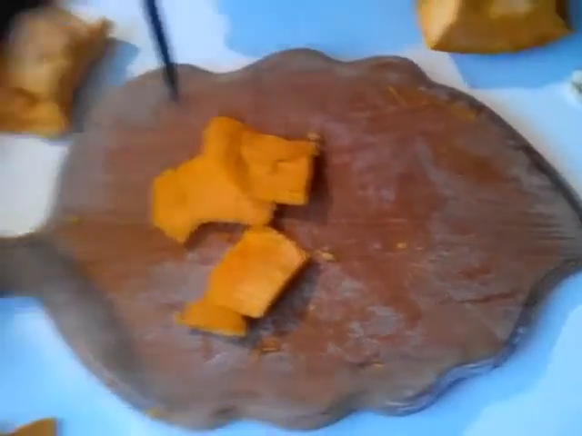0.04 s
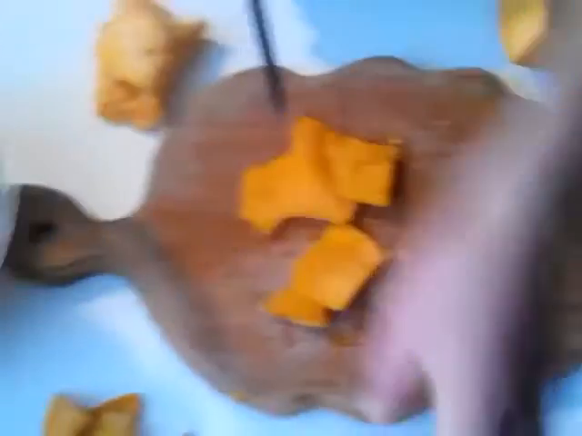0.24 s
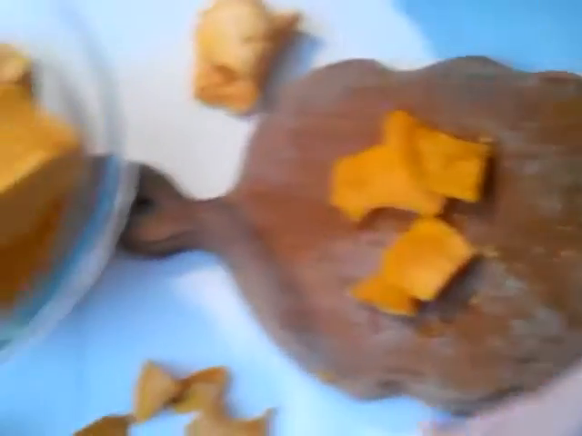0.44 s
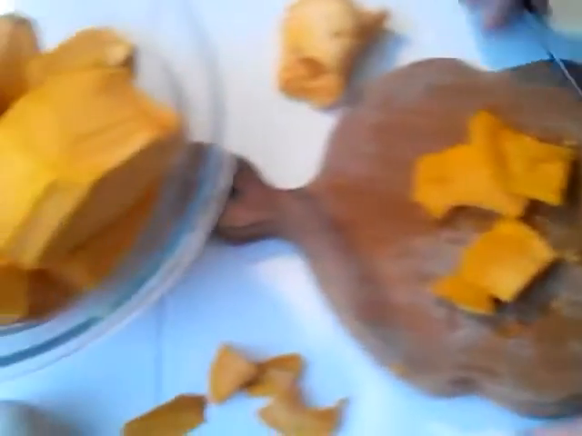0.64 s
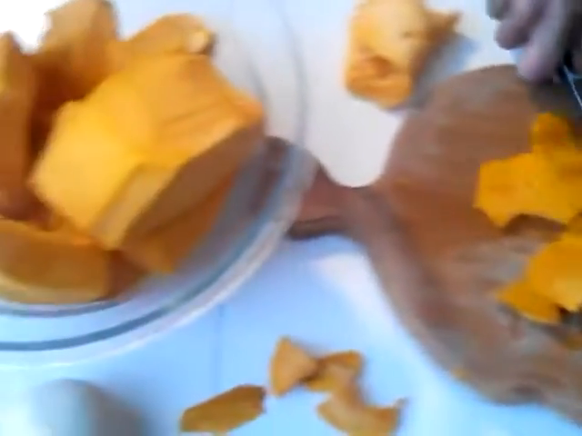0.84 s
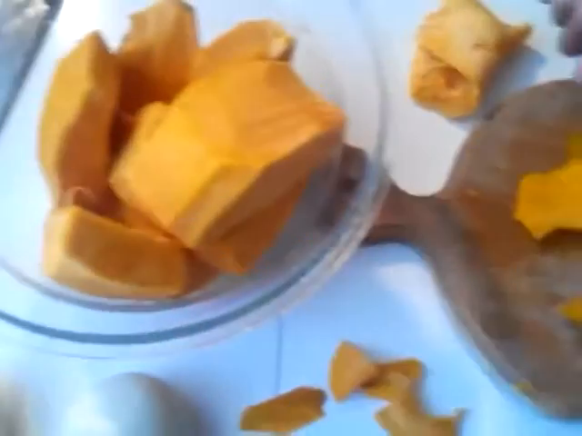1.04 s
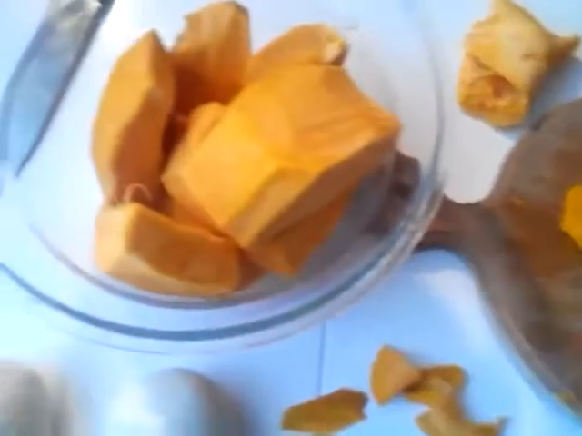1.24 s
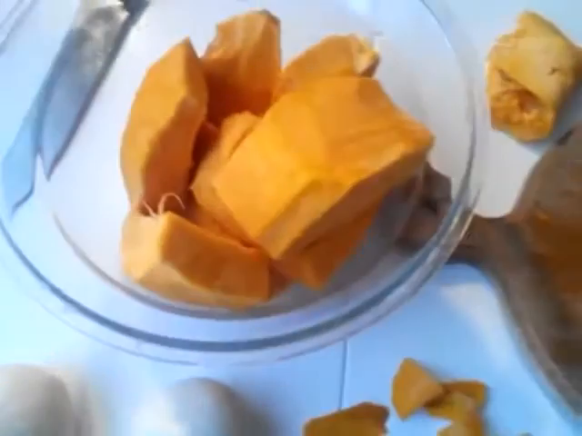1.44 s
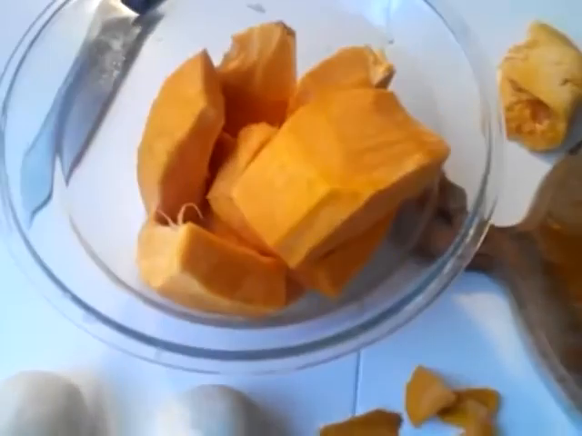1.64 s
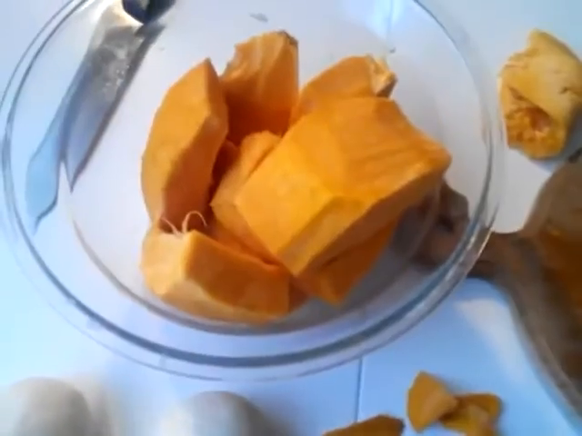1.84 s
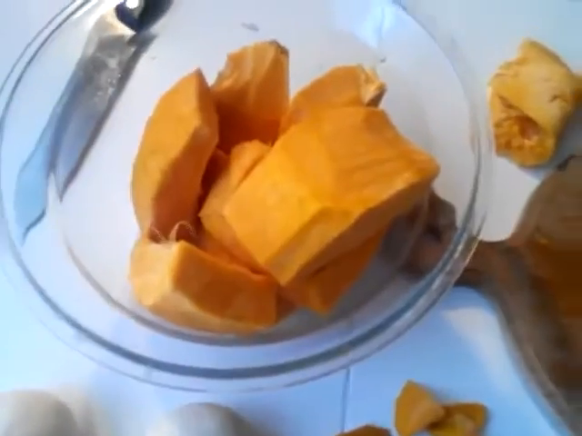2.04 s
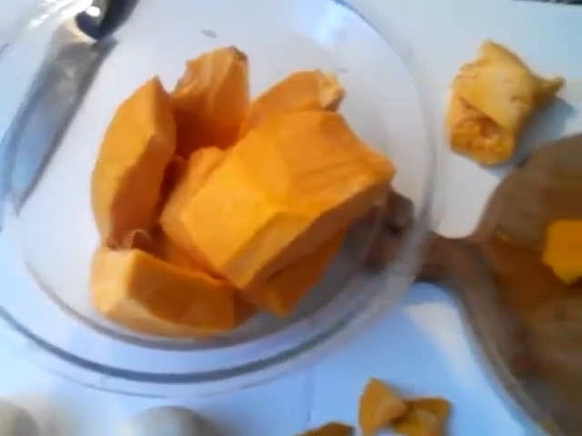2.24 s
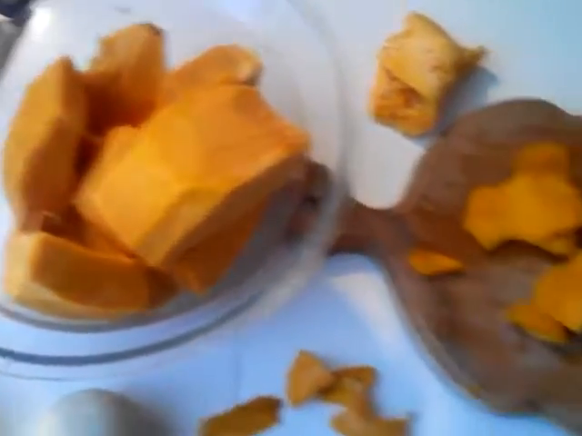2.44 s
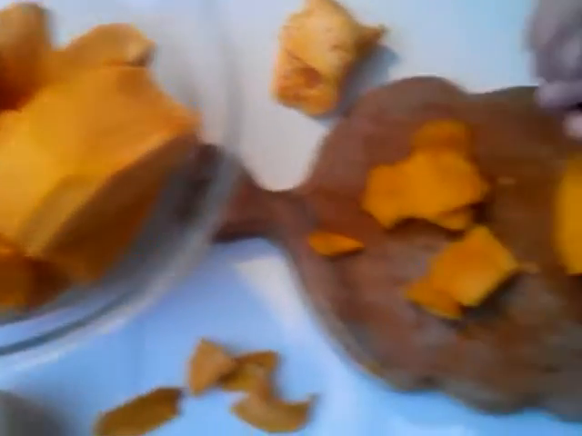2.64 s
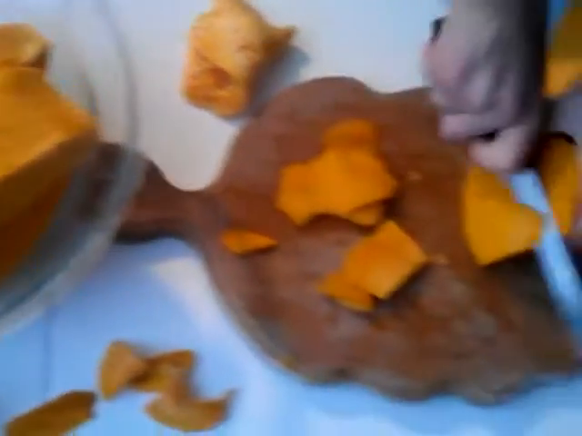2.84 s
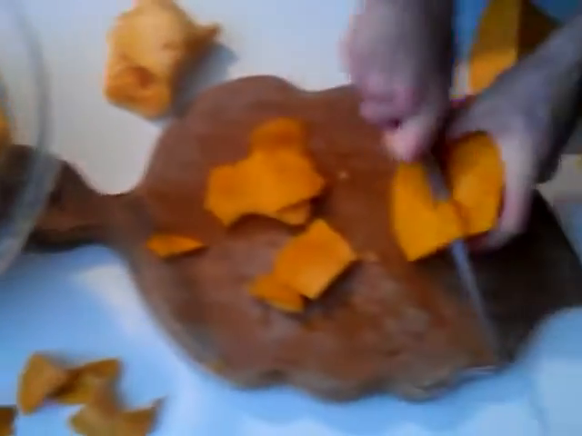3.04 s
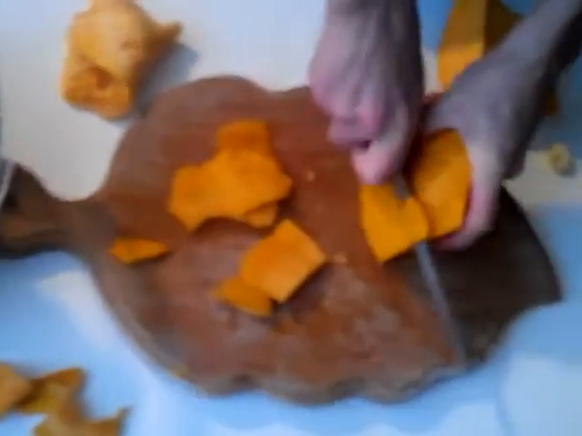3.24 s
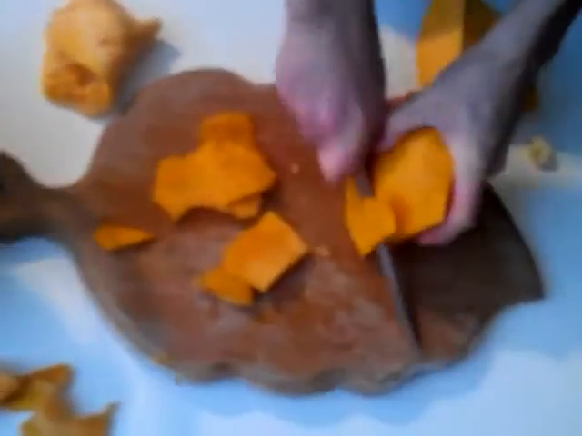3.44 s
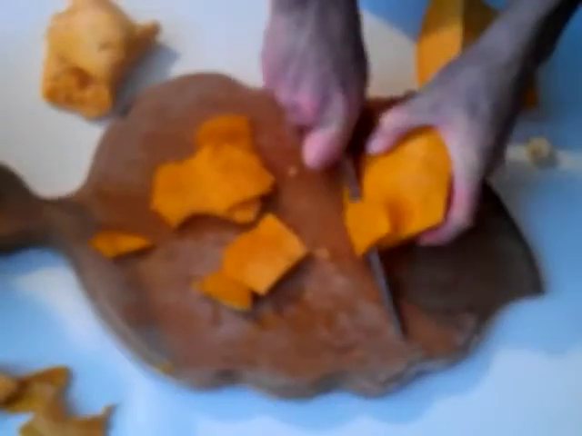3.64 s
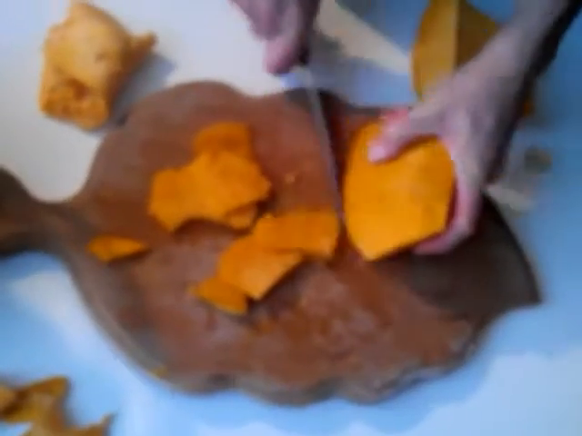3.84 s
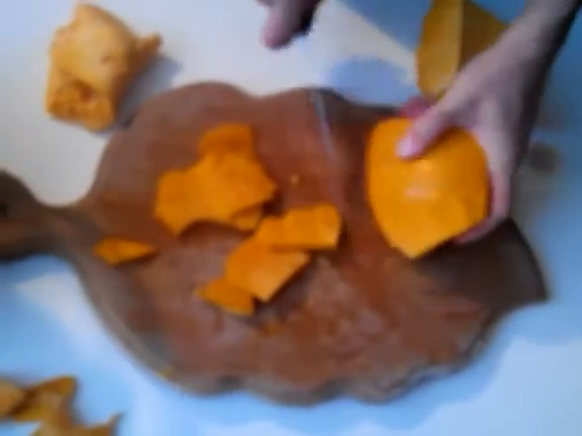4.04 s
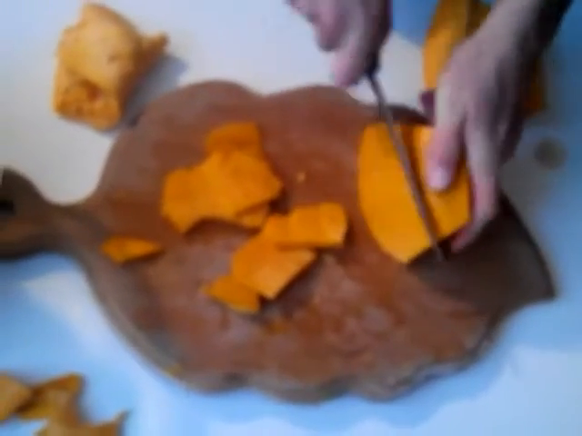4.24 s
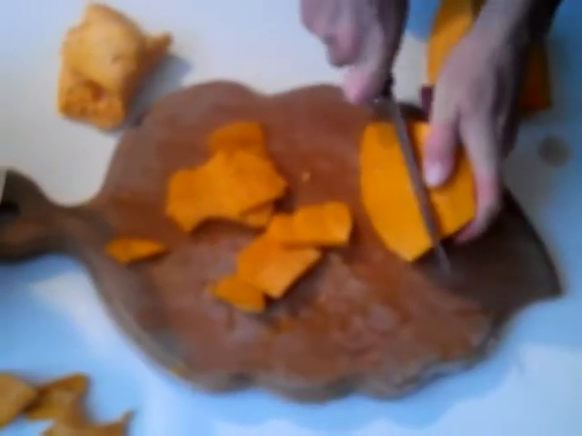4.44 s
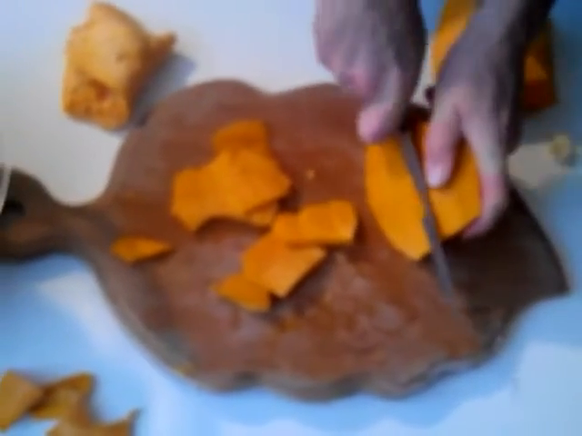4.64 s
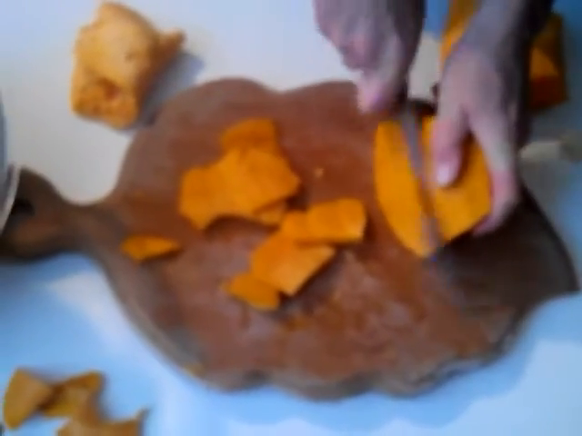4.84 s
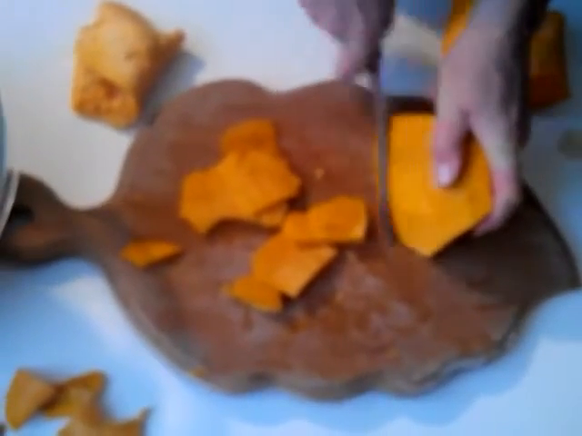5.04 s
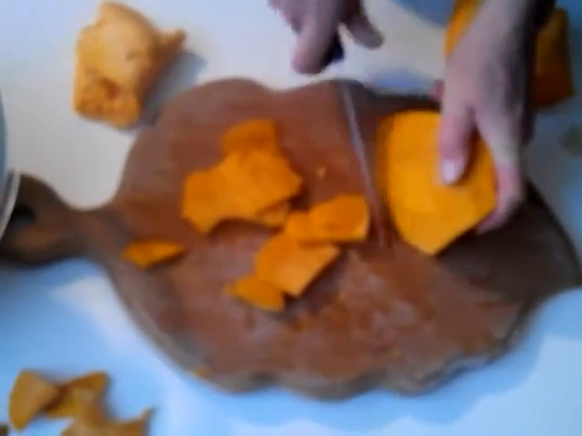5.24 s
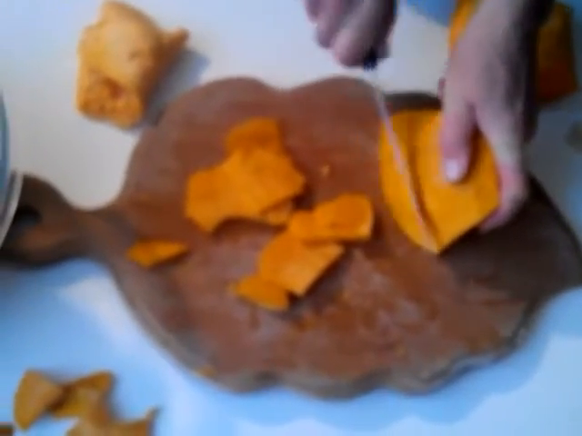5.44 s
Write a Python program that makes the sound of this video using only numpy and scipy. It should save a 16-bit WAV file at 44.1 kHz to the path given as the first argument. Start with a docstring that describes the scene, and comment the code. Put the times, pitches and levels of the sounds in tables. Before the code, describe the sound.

Close to the microphone in a small, lively kitchen, soft low bumps make a table hum while light knocks click on wood. Faint scrapes and a brief rattle follow, then crisp strokes and a hard knock. Crackling cuts through firm pumpkin lead to two loud chops in quick succession; after more quiet scraping, a last loud chop ends it. Faint hiss throughout, slightly dull treble, clipped peaks.

```python
"""A knife cuts raw pumpkin on a wooden board in a small kitchen, close to the microphone.
Over faint hiss, soft bumps first set the table humming and light knocks ring knife and board resonances.
Scrapes and strokes crackle as random bursts, with a brief rattle near 1 s and a hard knock near 2.4 s.
Two chops follow in quick succession and one ends the scene: the flesh splits, the blade smacks the board,
then chatters and crunches on. Loud peaks clip and the treble ends near 7.9 kHz."""
import sys
import numpy as np
from scipy import signal
from scipy.fft import rfft, irfft, next_fast_len
from scipy.io import wavfile
from scipy.ndimage import map_coordinates

SR = 44100
rng = np.random.default_rng(int(sys.argv[2]) if len(sys.argv) > 2 else 0)


def unload_wav(signal):
    """Save mono or channel-first audio to the path in sys.argv[1] as 16-bit WAV at rate SR, clipped to [-1, 1]."""
    wavfile.write(
        sys.argv[1],
        SR,
        np.round(np.clip(np.atleast_2d(signal).T, -1, 1) * 32767).astype(np.int16),
    )


N = 242550
T = np.arange(int(0.7 * SR)) / SR  # time axis of one event, s
TREBLE_END_HZ, TOP_HZ = 7850, 15850  # band edges after the first and the second clipping
STEEPNESS = 80  # exponent of both low-pass edges


def amp(db):
    """Decibels to gain."""
    return 10 ** (np.asarray(db) / 20)


def fade(t, t60):
    """A decay that loses 60 dB in t60 seconds."""
    return np.exp(-np.log(1000) * t / t60)


def along(points, hz):
    """Read (Hz, value) points on a logarithmic frequency axis."""
    point_hz, values = np.transpose(points)
    return np.interp(np.log(hz + 1), np.log(point_hz), values)


def add(track, s, sound):
    """Mix a sound into the track at time s."""
    part = track[round(s * SR):][:len(sound)]
    part += sound[:len(part)]


def filtered(x, gain):
    """Multiply the spectrum of x by a gain that depends on frequency."""
    size = next_fast_len(len(x) + SR // 10)
    hz = np.fft.rfftfreq(size, 1 / SR)
    return irfft(rfft(x, size) * gain(hz), size)[:len(x)]


def low_pass(x, edge_hz):
    """A steep upper band edge."""
    return filtered(x, lambda hz: 1 / np.sqrt(1 + (hz / edge_hz) ** STEEPNESS))


def snap(magnitude, travel=0, size=4096):
    """A minimum-phase click with the given spectrum, spread like a bending wave: treble arrives first."""
    hz = np.fft.rfftfreq(size, 1 / SR)
    # folding the cepstrum onto positive time gives minimum phase
    cepstrum = irfft(np.log(magnitude(hz) + 1e-6))
    cepstrum[1:size // 2] *= 2
    cepstrum[size // 2 + 1:] = 0
    # travel: seconds taken at 1 kHz; the delay is counted from the arrival of TOP_HZ
    lag_cycles = travel * (2 * np.sqrt(1000 * hz) - hz * np.sqrt(1000 / TOP_HZ))
    return irfft(np.exp(rfft(cepstrum) - 2j * np.pi * lag_cycles))


# decay time of the kitchen: freq_hz, t60_s
ROOM_DECAY = [(120, 0.57), (300, 0.35), (700, 0.43), (1600, 0.4), (2200, 0.455), (2900, 0.39), (4500, 0.36),
              (7500, 0.28)]
# colour of the kitchen's answer: freq_hz, level_db
ROOM_COLOUR = [(100, -6.5), (170, -3.5), (300, 1), (800, -1), (2000, -10.5), (4500, -5.5), (7500, -18)]


def kitchen(sound, wet_db, gap=0.0023):
    """The direct sound plus a fresh diffuse answer of the walls: decaying noise that builds up over gap s."""
    hz, t, z = signal.stft(rng.standard_normal(len(T)), SR, nperseg=256)
    t60 = along(ROOM_DECAY, hz)[:, None]
    # slow decays start lower, so that the decay time leaves the energy alone
    gain = amp(along(ROOM_COLOUR, hz))[:, None] * np.sqrt(2 * np.log(1000) / (t60 * SR))
    tail = signal.istft(z * gain * fade(t, t60), SR, nperseg=256)[1][:len(T)]
    response = amp(wet_db) * tail * (1 - np.exp(-(T / gap) ** 2))
    response[0] = 1  # direct sound
    return signal.fftconvolve(sound, response)


# spectrum of the hiss: freq_hz, relative level_db (per Hz)
HISS_SPECTRUM = [(25, -15), (70, -11), (150, -10.5), (400, -9), (700, -12.5), (1500, -14), (4000, -17.5),
                 (7000, -20.5), (7800, -24.5)]
HISS_DB = -59  # rms level


def background():
    """The faint even hiss of a quiet room: steady noise shaped in frequency."""
    noise = filtered(rng.standard_normal(N), lambda hz: amp(along(HISS_SPECTRUM, hz)))
    return amp(HISS_DB) * noise / np.std(noise)


# modes of the table top: freq_hz, relative level_db, t60_s
TABLE_MODES = [(113, -6, .13), (149, -0.5, 0.3), (257.1, 3.5, 0.21), (353, 0.5, 0.15), (396.84, -8.5, 0.24),
               (499, -22, 0.5)]
# soft bumps on the table: start_s, level_db (peak), pitch_hz
TABLE_BUMPS = [ (0.32, -23.5, 121.7), (0.344, -21.5, 125.2), (0.355, -16.5, 239.4), (0.371, -18.5, 148.5),
               (0.42, -20.5, 170.8), (0.455, -30.5, 183), (0.774, -36, 150.9), (0.805, -34.5, 177.5),
               (1.614, -14, 151.3), (1.624, -19.5, 341.4), (1.848, -34.5, 139), (1.985, -39.5, 147),
               (2.415, -27.5, 273.3), (2.769, -28.5, 276.7), (2.852, -36.5, 146.8), (3.828, -38.5, 140),
               (4.366, -25, 137), (4.44, -35.5, 127), (4.549, -36, 277.6)]
HUM_DB, HUM_GROWS = -3, 0.15  # hum re the push, before it is halved; dB more for each dB of push
HUM_SCATTER_DB = 2  # random spread of each mode


def bumps(swell_cycles=1.3, hum_rise=0.011):
    """A soft push of a few cycles sets the table top humming, each time in a new mix of its modes."""
    out = np.zeros(N)
    for s, db, pitch_hz in TABLE_BUMPS:
        age = T * pitch_hz / swell_cycles
        push = (age * np.exp(1 - age)) ** 2 * np.sin(2 * np.pi * pitch_hz * T)
        hum = np.zeros(len(T))
        for hz, level, t60 in TABLE_MODES:
            mode_gain = amp(level + rng.normal(0, HUM_SCATTER_DB))
            hum += mode_gain * fade(T, t60) * np.sin(2 * np.pi * hz * T)
        hum = amp(HUM_DB + HUM_GROWS * db) * hum * (1 - np.exp(-T / hum_rise)) / 2
        add(out, s, kitchen(amp(db) * (push + hum), wet_db=-3.0))
    return out


# spectrum of one burst: freq_hz, relative level_db (per Hz)
BURST_SPECTRUM = [(35, -34), (65, -10), (130, -2), (290, -1.5), (380, -8), (750, -18.5), (1000, -11.5),
                  (1600, -6), (2200, -6.5), (3100, -15.5), (4500, -14), (6400, -13.5), (7400, -27),
                  (8200, -39)]


def crackle(envelope, crisp_db, groan_db, clumps_per_s=240):
    """Rubbed or splitting flesh: short bursts at random times, in clumps, with adjustable treble and bass."""
    bursts_per_s, spread_db, clump_db = 5000, 3.2, 2.3  # spreads of single bursts and of clumps
    n = len(envelope)
    knots = rng.standard_normal(int(n * clumps_per_s / SR) + 4)
    clumps = map_coordinates(knots, [np.arange(n) * clumps_per_s / SR], order=1)
    sizes = amp(spread_db * rng.standard_normal(n) + clump_db * clumps)
    sizes = sizes * rng.choice([-1, 1], n)
    bursts = sizes * (rng.random(n) < bursts_per_s / SR)
    bursts = bursts / (np.sqrt(np.mean(bursts ** 2)) + 1e-9) * envelope

    def spectrum(hz):
        treble_db = crisp_db * np.log2(1 + (hz / 5000) ** 2)
        bass_db = groan_db / (1 + (hz / 420) ** 4)
        return amp(along(BURST_SPECTRUM, hz) + treble_db + bass_db)

    pop = snap(spectrum, travel=0.001493)
    return kitchen(signal.fftconvolve(bursts, pop / np.linalg.norm(pop)), wet_db=2.0)


ATTACK_S, RELEASE_T60, SAG_DB = 0.0039, 0.055, -0.5  # level change along the stroke is SAG_DB


def stroke_envelope(length):
    """The level of one stroke: it bites, sags very slightly and lets go."""
    t = T[T < length + RELEASE_T60]
    sag = amp(SAG_DB * (np.minimum(t / length, 1) - 0.5))
    return (1 - np.exp(-t / ATTACK_S)) * sag * fade(np.maximum(t - length, 0), RELEASE_T60)


# strokes through the flesh, and scrapes of knife or chunks sliding:
# start_s, length_s, level_db, crisp_db (at 5 kHz)
CUT_STROKES = [ (0.859, .078, -57.5, -4), (1.039, 0.2082, -51.5, -5), (2.139, 0.0142, -49, 1),
               (2.308, 0.0125, -34.5, 6.5), (2.341, 0.0162, -34, 7.5), (2.366, 0.0583, -39, 5.5),
               (2.859, 0.233, -54.5, -5), (3.001, 0.0503, -50.5, -5), (3.13, 0.0906, -32.5, -0.5),
               (3.261, 0.1047, -48.5, -0.5), (3.383, .026, -32, -2), (3.427, 0.0098, -36, 4.5),
               (3.737, 0.0615, -42.5, 10), (4.01, 0.037, -31.5, 4), (4.054, 0.0316, -41.5, 7),
               (4.201, 0.229, -57.5, -6.5), (4.66, 0.0756, -55, -10), (4.822, 0.0575, -45, -4.5),
               (4.879, 0.0239, -37.5, 2), (5.022, 0.0696, -49, -1.5)]
GROAN_ONSET_DB, GROAN_PER_DB = -34, 0.2336  # stroke level of no added bass; bass dB per dB below it


def cutting():
    """Strokes and scrapes crackle; the gentler they are, the more bass they carry."""
    out = np.zeros(N)
    for s, length, db, crisp_db in CUT_STROKES:
        groan_db = GROAN_PER_DB * (GROAN_ONSET_DB - db)
        add(out, s, crackle(amp(db) * stroke_envelope(length), crisp_db, groan_db))
    return out


def resonances(modes, hz, tilt_db=0, scatter_db=1):
    """Power spectrum of steep-sided resonances; a narrow one rings longer, so its peak stands higher."""
    centre = np.mean([mode[0] for mode in modes])
    power = 0
    for mode_hz, width, db in modes:
        level = db + tilt_db * np.log2(mode_hz / centre) + rng.normal(0, scatter_db)
        detune = (hz ** 2 - mode_hz ** 2) / ((hz + 1) * width)
        power += (amp(level) * SR / (2 * width) / (1 + detune ** 2)) ** 2
    return power


# quickly damped resonances of knife on wood, blade and board, each: freq_hz, width_hz, relative level_db
KNOCK_MODES = [(1380, 320, -14.5), (1633.2, 373, -9.5), (2029, 389.5, -6.5), (2527.4, 320, -17)]
STEEL_MODES = [(3450, 2000, -5), (4172, 440, -7), (4951, 500, -6), (5536, 990, -4.5), (6750, 680, -11.5)]
BOARD_MODES = [(159.34, 48, -12), (276.54, 81, -5), (508.4, 160, -6), (723, 230, -8), (1004, 220, -2)]


def strike(knock_db, tilt_db, steel_db, steel_tilt_db, board_db, chatter_db, chatter_t60,
           spread_db=0.5, travel=0.0028, soft_hz=6200):
    """One blow rings knife, blade and board; random lighter touches then chatter to rest."""
    touches_per_s = 1300

    def spectrum(hz):
        power = amp(knock_db) ** 2 * resonances(KNOCK_MODES, hz, tilt_db)
        power += amp(steel_db) ** 2 * resonances(STEEL_MODES, hz, steel_tilt_db)
        power += amp(board_db) ** 2 * resonances(BOARD_MODES, hz)
        return np.sqrt(power / (1 + (hz / soft_hz) ** 10))  # the treble of the blow fades above soft_hz

    blow = snap(spectrum, travel)
    touches = (rng.random(len(T)) < touches_per_s / SR) * rng.choice([-1, 1], len(T))
    sizes = amp(spread_db * rng.standard_normal(len(T)))
    chatter = touches * sizes * fade(T, chatter_t60) * (T > 0.002)
    force = amp(chatter_db) * chatter / (np.linalg.norm(chatter) + 1e-9)
    force[0] = 1  # the blow itself
    return kitchen(signal.fftconvolve(force, blow)[:len(T)], wet_db=0.5)


# knocks on the wood, and a brief scraping rattle near 1.05 s: start_s, knock_db, steel_db, board_db
WOOD_KNOCKS = [ (0.3327, -15, -26.5, -29), (0.3457, -10, -21.5, -20.5), (0.3691, -17.5, -35.5, -29.5),
               (0.4132, -18.5, -33.5, -36.5), (0.906, -52.5, -52, -50), (0.9494, -2.5, -20.5, -34),
               (0.9695, -23, -51.5, -37.5), (1.025, -27.5, -49, -54), (1.048, -23.5, -39, -48),
               (1.068, -26, -38.5, -52), (1.254, -44, -67, -50.5), (1.6153, -20.5, -47, -31),
               (1.624, -11.5, -23.5, -22.5), (2.4462, 7.5, -18.5, -8.5), (2.6115, -25, -80, -34.5),
               (2.72, -24, -56.5, -43.5), (3.786, -31, -28, -46), (4.17, -27, -45, -47.5),
               (4.8835, -26, -35.5, -43)]
TILT_PER_DB, EVEN_STEEL_DB = 0.4831, -25.5  # dB per octave for each dB of steel over the even level
KNOCK_STEEL_TILT_DB = -14  # dB per octave
KNOCK_CHATTER_DB, KNOCK_CHATTER_T60 = -4, 0.085  # rattle after a knock: dB re the blow, s
SQUASH_DB, SQUASH_T60 = -20, 0.031  # short crackle with each knock: dB re the steel, s


def knocks():
    """Knocks and a rattle on the wood: more steel makes them brighter; each brings a short crackle."""
    out = np.zeros(N)
    for s, db, steel_db, board_db in WOOD_KNOCKS:
        tilt_db = TILT_PER_DB * (steel_db - EVEN_STEEL_DB)
        knock = strike(db, tilt_db, steel_db, KNOCK_STEEL_TILT_DB, board_db,
                       KNOCK_CHATTER_DB, KNOCK_CHATTER_T60)
        add(out, s, knock)
        squash = amp(steel_db + SQUASH_DB) * fade(T[T < SQUASH_T60], SQUASH_T60)
        add(out, s, crackle(squash, crisp_db=4.5, groan_db=-4))
    return out


# the blade breaks through and hits the board: start_s (of the blow), knock_db, knock_tilt_db (per octave),
# steel_db, board_db, split_s (length before the blow), chatter_db, crunch_db, settling_t60_s
BREAKTHROUGHS = [ (3.6394, 3.5, 10, -8.5, -16, 0.03583, -10, -32, 0.078),
                 (3.8602, 4, 17, 4, -18, 0.00691, -4, -16.5, 0.2487),
                 (5.194, 8.5, -12, 3, -16, .044, -14.5, -18.5, 0.3604)]
CHOP_STEEL_TILT_DB = -3.5  # dB per octave
SPLIT_ENERGY_DB = -38  # splits share one energy (dB over one second), so a quick one is louder
SPLIT_CRISP_DB, SPLIT_GROAN_DB = 3, -3  # treble and bass of the splitting flesh
CRUNCH_CRISP_DB, CRUNCH_GROAN_DB = -3, -7.5  # the same as the blade slides on


def chops():
    """The flesh splits, the blade smacks the board, then crunches on along the cut as it settles."""
    out = np.zeros(N)
    for s, knock_db, tilt_db, steel_db, board_db, split_s, chatter_db, crunch_db, t60 in BREAKTHROUGHS:
        split = amp(SPLIT_ENERGY_DB) / np.sqrt(split_s) * stroke_envelope(split_s)
        add(out, s - split_s, crackle(split, SPLIT_CRISP_DB, SPLIT_GROAN_DB))
        smack = strike(knock_db, tilt_db, steel_db, CHOP_STEEL_TILT_DB, board_db, chatter_db, t60)
        add(out, s, smack)
        crunch = amp(crunch_db) * fade(T, t60)
        add(out, s, crackle(crunch, CRUNCH_CRISP_DB, CRUNCH_GROAN_DB))
    return out


def scene():
    """Everything happens on the table, just under the microphone."""
    return (background() + bumps() + cutting() + knocks() + chops())[None]


def record(dry, ceiling=0.966):
    """Band-limited sound: loud peaks clip, treble ends near 7.9 kHz, then peaks clip again at full scale."""
    overloaded = np.clip(dry[0], -ceiling, ceiling)
    narrow = low_pass(overloaded, TREBLE_END_HZ)
    return low_pass(np.clip(narrow, -1, 1), TOP_HZ)[None]


dry = scene()
out = record(dry)
unload_wav(out)
```